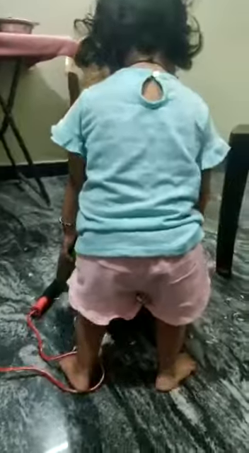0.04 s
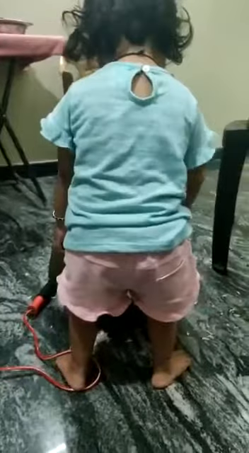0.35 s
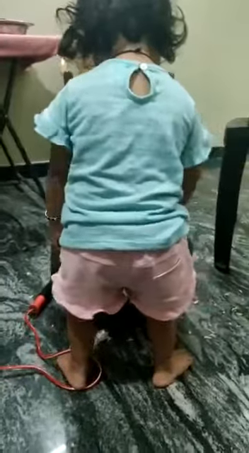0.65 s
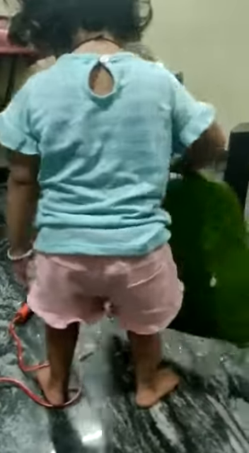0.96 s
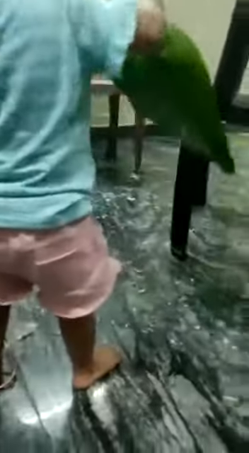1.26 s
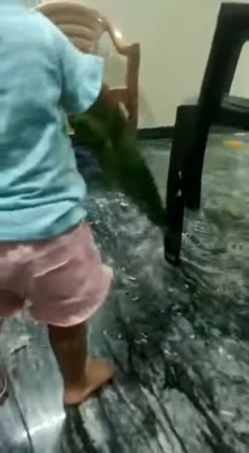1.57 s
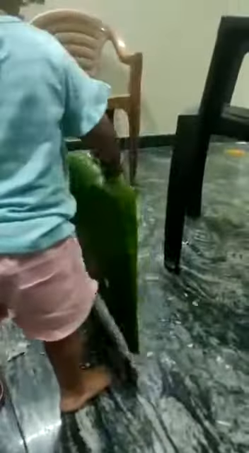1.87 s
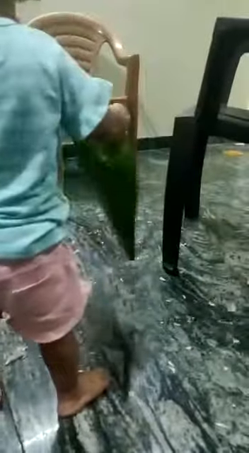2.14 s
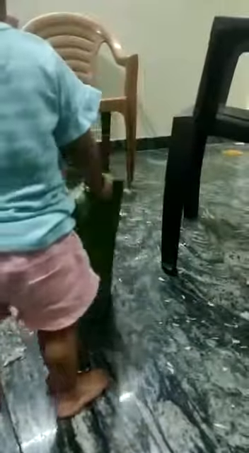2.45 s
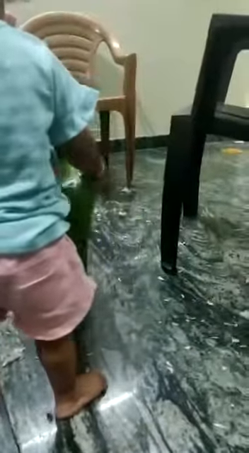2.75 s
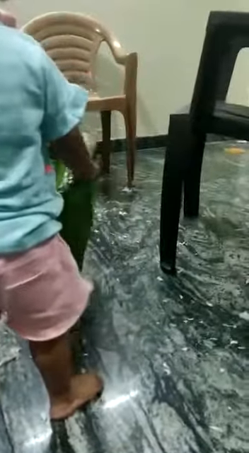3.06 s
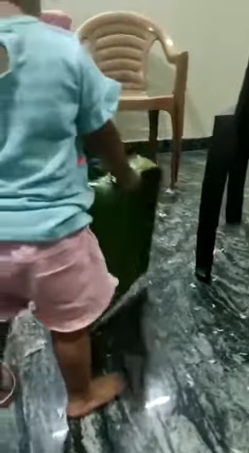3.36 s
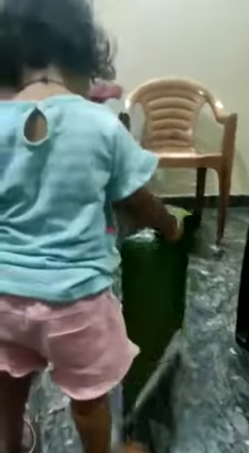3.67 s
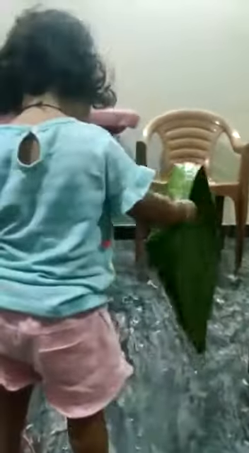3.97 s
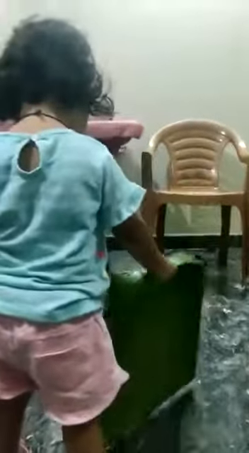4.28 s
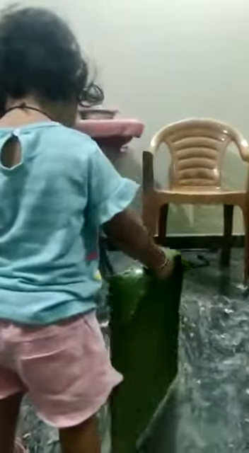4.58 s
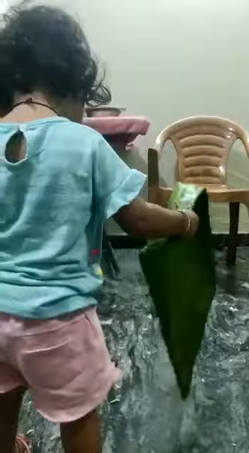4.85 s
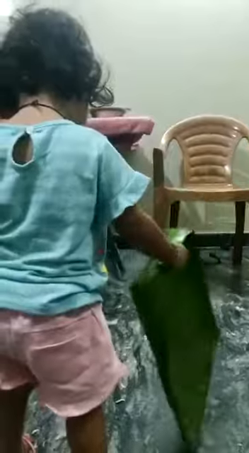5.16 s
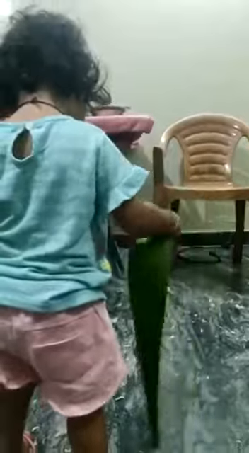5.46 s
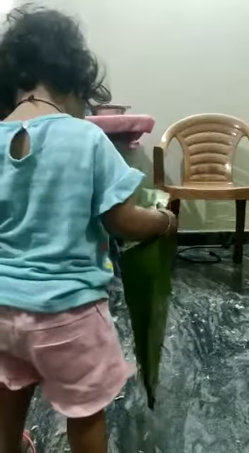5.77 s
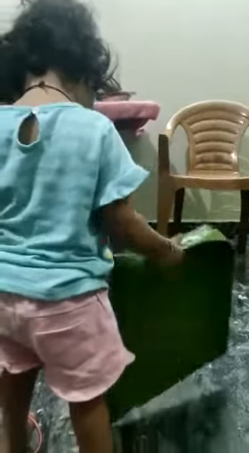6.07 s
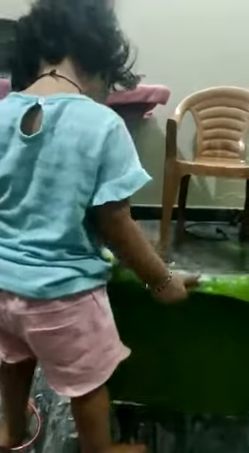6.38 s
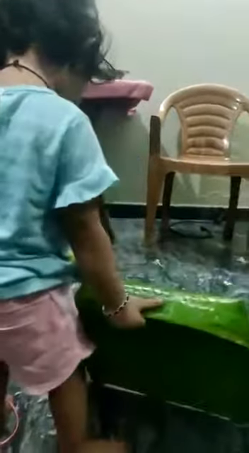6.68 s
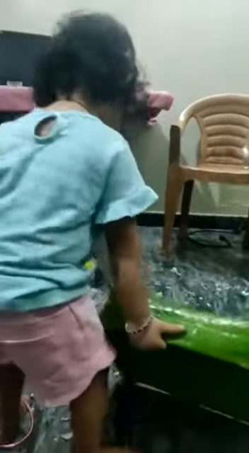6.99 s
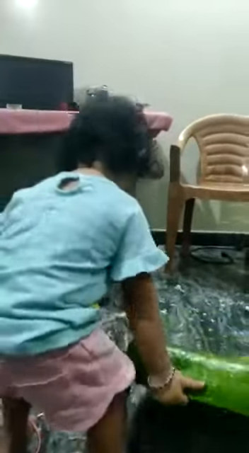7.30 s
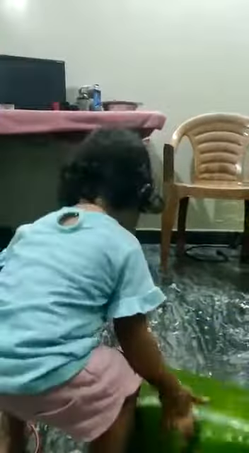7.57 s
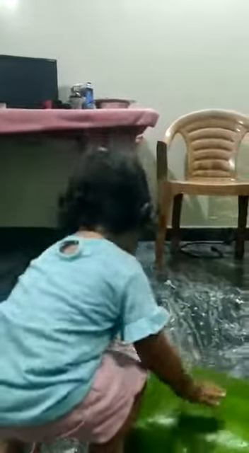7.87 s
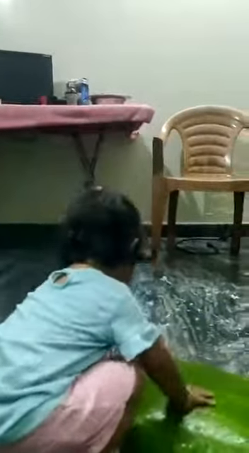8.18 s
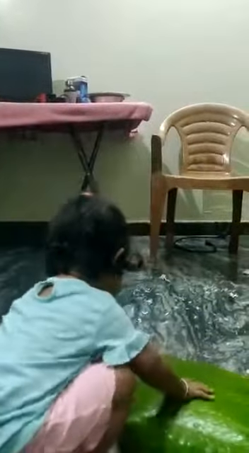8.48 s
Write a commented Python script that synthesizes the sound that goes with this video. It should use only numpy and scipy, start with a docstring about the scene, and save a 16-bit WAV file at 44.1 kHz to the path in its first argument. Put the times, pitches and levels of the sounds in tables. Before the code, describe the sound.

In a bare, echoing room with a low hum, a big leaf smacks a stone floor close to the microphone. The hits are irregular, some light and dull, others sharp and loud with a small flap afterwards, and faint rustling and crackling fill the gaps. Finally the leaf is slapped down and patted several times in quick succession, and a palm rubs quietly along it with a faint, thin squeak.

```python
"""A low hum, and over it the rustle of a big stiff leaf sliding on the stone floor of a bare room.
A small child swings the leaf against the floor, then lays it down and pats it flat.
Each blow is a thump of the bending blade, a clap of trapped air and a crackle of fibres,
and the hard walls ring after it. Near the end a hand rubs the leaf along and the palm squeaks."""
import sys
import numpy as np
from scipy import signal
from scipy.fft import rfft, irfft, next_fast_len
from scipy.io import wavfile
from scipy.ndimage import uniform_filter1d, minimum_filter1d, map_coordinates

SR = 44100
rng = np.random.default_rng(int(sys.argv[2]) if len(sys.argv) > 2 else 0)


def output_pcm(signal):
    """Save a mono or channel-first signal as 16-bit PCM at the path in sys.argv[1].

    Samples are clipped to [-1, 1] before scaling.
    """
    pcm = np.clip(np.atleast_2d(signal).T, -1, 1) * 32767
    wavfile.write(sys.argv[1], SR, np.round(pcm).astype(np.int16))


N = 385290
TIME = np.arange(N) / SR

# light strokes of the leaf across the stone: middle_s, length_s, level_db
STROKES = [(.25, 0.2, -56), (.68, 0.23, -50.5), (.97, 0.083, -51.5), (1.2, 1, -55), (2.08, 0.063, -58),
           (3.33, 0.34, -55.5), (3.85, 1, -61), (5.58, 0.13, -61.5), (5.98, 0.083, -56.5), (6.85, 1, -60),
           (7.3, 0.43, -53), (8.1, 0.21, -50.5), (8.52, 0.23, -50)]
# how alike the room sounds on the left and right (1 is the same): pitch_hz, likeness
LIKENESS = [(60, 0.93), (150, 0.98), (300, 0.79), (500, 0.68), (900, 0.037), (1800, -0.026), (4000, 0.089)]


def from_db(db):
    """Turn decibels into a gain to multiply by."""
    return 10 ** (np.asarray(db) / 20)


def rms_one(x):
    """Scale a sound so its average power is one."""
    return x / np.sqrt(np.mean(x ** 2) + 1e-20)


def at_hz(points, hz):
    """Read between a table's rows, with octaves evenly spaced."""
    row_hz, value = np.transpose(points)
    return np.interp(np.log(np.maximum(hz, 1)), np.log(row_hz), value)


def fade(t, ring_s):
    """A gain that falls by 60 dB in ring_s seconds."""
    return np.exp(-np.log(1000) * t / ring_s)


def add(tracks, start_s, near, to_room):
    """Mix a sound into two tracks: what is heard directly and what goes into the room."""
    start = int(start_s * SR)
    tracks[:, start:start + len(near)] += np.array([near, to_room])[:, :N - start]


def butter(x, hz, kind, order=2):
    """Keep only the lows, the highs or one band of a sound."""
    return signal.sosfilt(signal.butter(order, np.clip(hz, 10, .45 * SR), kind, fs=SR, output="sos"), x)


def coloured(x, colour, size=2048):
    """Give each pitch its level from a table, with no ringing ahead of the sound (minimum phase)."""
    cepstrum = irfft(np.log(from_db(at_hz(colour, np.arange(size // 2 + 1) * SR / size))))
    cepstrum[1:size // 2] *= 2
    cepstrum[size // 2 + 1:] = 0
    return signal.fftconvolve(x, irfft(np.exp(rfft(cepstrum))))[:len(x)]


def flutter(per_s, depth_db):
    """A gain that wanders at random."""
    knots = rng.standard_normal(N // 20)
    return from_db(depth_db * np.interp(TIME * per_s, np.arange(len(knots)), knots))


def swells(strokes):
    """A gain that rises and falls with each stroke, staying above half power for length_s."""
    return np.sqrt(sum(from_db(db) ** 2 * .5 ** np.minimum((2 * (TIME - middle_s) / length_s) ** 2, 100)
                       for middle_s, length_s, db in strokes))


def diffuse(colour, size=N):
    """Noise arriving from all sides: left and right are alike only in the bass."""
    padded = next_fast_len(size, real=True)
    hz = np.arange(padded // 2 + 1) * SR / padded
    mid, side = rfft(rng.standard_normal((2, padded)))
    alike = np.clip(at_hz(LIKENESS, hz), -.99, .99)
    pair = np.sqrt((1 + alike) / 2) * mid + np.sqrt((1 - alike) / 2) * side * [[1], [-1]]
    return irfft(pair * from_db(at_hz(colour, hz)), padded)[:, :size]


def thin_tones(rows):
    """Unsteady tones, made of narrow bands of noise, that swell and fade."""
    out = np.zeros(N)
    for middle_s, length_s, db, hz, width_hz in rows:
        gain = swells([(middle_s, length_s, db)]) * flutter(per_s=39, depth_db=2.5)
        band_hz = [hz - width_hz / 2, hz + width_hz / 2]
        out += gain * rms_one(butter(rng.standard_normal(N), band_hz, "band"))
    return out


def background_hum():
    """A low rumble with a few wavering tones in it."""
    # tone colour of the rumble: pitch_hz, level_db
    rumble_colour = [(20, -9), (35, -11), (55, -7.5), (78, -10.5), (100, -5), (125, -21.5), (170, -9),
                     (290, -14), (450, -22), (1000, -28), (3000, -34), (8000, -36.5), (16000, -12.5)]
    # tones that never stop: pitch_hz, level_db
    hum_tones = [(56.3, -57), (102.3, -64), (204.6, -66), (231.5, -64), (296.1, -62)]
    # faint tones that come and go: middle_s, length_s, level_db, pitch_hz, width_hz
    faint_tones = [(1.11, 0.33, -67, 1150, 53), (5.93, 0.35, -68, 700, 20)]
    tones = sum(from_db(db) * np.sqrt(2) * np.sin(2 * np.pi * hz * TIME)
                * flutter(per_s=26, depth_db=2.5) for hz, db in hum_tones)
    rumble = from_db(-40.5) * rms_one(diffuse(rumble_colour))
    return rumble + tones + thin_tones(faint_tones)


def slide():
    """The leaf hisses unevenly on the stone as each stroke gathers speed and slows again."""
    # tone colour of the hiss: pitch_hz, level_db
    hiss_colour = [(300, -26.5), (1000, -5.5), (2000, 2), (3500, -1.5), (6000, 3.5), (9000, 0),
                   (16000, -14.5)]
    return swells(STROKES) * flutter(per_s=61, depth_db=1.5) * rms_one(diffuse(hiss_colour))


def rib_ticks(per_s=22, boost_db=13, spread_db=3.5):
    """Ribs of the sliding leaf catch on the stone with tiny clicks."""
    sizes = from_db(boost_db + spread_db * np.minimum(rng.exponential(1, N), 3))
    clicks = (rng.random(N) < per_s / SR) * sizes * swells(STROKES)
    return butter(clicks + 1e-18, [1500, 9000], "band", order=1)


def scuffs():
    """The leaf's edge catches and skids: a narrow hiss that starts fast and fades."""
    # skids of the edge: start_s, length_s, level_db, pitch_hz, width_hz
    skids = [(0.57, 0.27, -57, 5360, 2210), (3.273, 0.27, -57, 1960, 1210),
             (5.534, 0.043, -57.5, 1190, 2080), (6.591, 0.029, -40, 6800, 3030),
             (7.671, 0.09, -34, 1770, 790)]
    t, tracks = TIME[:SR], np.zeros((2, N))
    for start_s, length_s, db, hz, width_hz in skids:
        band_hz = [max(hz - width_hz / 2, hz / 10), hz + width_hz / 2]
        hiss = rms_one(butter(rng.standard_normal(SR), band_hz, "band"))
        skid = from_db(db) * hiss * np.sin(np.pi * np.sqrt(np.minimum(t / length_s, 1)))
        add(tracks, start_s, skid, skid)
    return tracks


def thump(t, hz, ring_s, rise_s=0.0025, slack_share=0.11, tighten_s=0.0037):
    """The blade flexes briefly; the grip sets its pitch, which rises as it presses on the stone."""
    # ways the blade bends: pitch_ratio, level_db, ring_time_share
    blade_modes = [(0.401, -42.5, 0.65), (0.719, -2, 0.27), (0.999, -2, 0.58), (1.45, -26.5, 0.84),
                   (2.05, -36.5, .8)]
    cycles = hz * (t - slack_share * tighten_s * (1 - np.exp(-t / tighten_s)))
    flex = sum(from_db(db) * np.sin(2 * np.pi * cycles * ratio) * fade(t, ring_s * share)
               for ratio, db, share in blade_modes)
    return -flex * (1 - np.exp(-t / rise_s))


def clap(t, hz, hollow_db, landing_s, top_hz, touch_count=5):
    """A puff of air rings in the hollow under the blade; smaller touches follow as the rest lands."""
    # tone colour of the air squeezed out: pitch_ratio, level_db
    puff_colour = [(.06, -18.5), (.17, -9.5), (.35, -0.5), (.65, -1.5), (1, -4), (1.25, -4.5), (1.6, -11.5),
                   (2.15, -11), (3, -20.5), (5.5, -27), (15, -36.5)]
    puff = coloured(signal.unit_impulse(len(t)), np.array(puff_colour) * [hz, 1])
    puff = puff / np.abs(puff).max()
    hollow = butter(puff, [hz / 1.08, hz * 1.08], "band", order=1)
    puff = butter(puff + (from_db(hollow_db) - 1) * hollow, top_hz, "low", order=4)
    delays = (landing_s * SR * rng.gamma(2, .5, touch_count)).astype(int)
    touches = np.bincount(delays, weights=rng.uniform(0.04, 0.4, touch_count))
    touches[0] += 1
    spread = signal.fftconvolve(touches, puff)[:len(t)]
    near = spread * np.linalg.norm(puff) / np.linalg.norm(spread)
    # the walls merge the touches, so the room gets one puff of the same energy
    return np.array([near, puff])


def crackle(t, snap_s=0.0022, settle_s=0.057, settle_db=-15, grain_db=4, edge_db=4):
    """Fibres snap on contact and tick as the blade settles; gives the near sound and the room's part."""
    # papery ring of the fibres: pitch_hz, level_db
    fibre_colour = [(200, 13), (700, 3), (1450, 4), (1870, 10), (2150, 5), (2700, -1), (5000, -1),
                    (8500, -3), (15000, -10.5)]
    noise = rng.standard_normal(len(t))
    grains = rms_one(noise * from_db(grain_db * np.minimum(rng.exponential(1, len(t)), 4)))
    snap = grains * np.exp(-t / snap_s)
    settle = grains * from_db(settle_db) * np.exp(-t / settle_s) * (1 - np.exp(-t / snap_s))
    # the walls blur the snap's grains together, so the room gets one even click
    click = np.linalg.norm(snap) * signal.unit_impulse(len(t))
    crisp_edge = from_db(edge_db) * butter(click, 11000, "high")
    return np.array([coloured(onset + settle, fibre_colour) for onset in (snap + crisp_edge, click)])


def blows():
    """The leaf hits the floor: a thump, a clap and a crackle together."""
    # blows of the leaf: start_s, thump_db, thump_hz, ring_s, clap_db, clap_hz,
    # hollow_db, crackle_db, room_db
    hits = [ (0.7412, -16, 319, 0.081, -28.5, 666, 5.5, -44, 2),
            (1.375, -9.5, 260, 0.023, -21.5, 1150, 6.5, -26, 10.5),
            (1.7138, 4, 315, 0.046, 4.5, 735, 3.5, -10.5, -2),
            (2.3958, -18, 270, 0.016, -37, 620, 0, -37.5, 13),
            (2.465, -8, 207, 0.033, 6.5, 917, 8, -14.5, -2),
            (3.085, -14.5, 278, 0.034, -32, 1000, 4.5, -31, 9),
            (3.4138, -14, 195, 0.059, -26, 890, -6, -31.5, 3),
            (3.4537, -13, 190, 0.011, -12, 765, 3.5, -40.5, -1),
            (4.2215, -23, 218, 0.036, -18.5, 550, 9, -21, 6),
            (4.296, -2, 211, 0.036, -21, 1000, -12, -18, 3),
            (4.3149, 1.5, 307, 0.033, 1, 1000, 7, -21, -2.5),
            (4.392, -8.5, 400, 0.055, -18.5, 576, 18, -30, -2),
            (5.066, -10, 306, 0.032, -51.5, 1260, 27.5, -26, 7.5),
            (6.161, -18.5, 257, 0.043, -26.5, 900, 6.5, -33.5, 8.5),
            (6.188, -5.5, 213, 0.033, -43, 960, -7, -24.5, 2.5),
            (6.212, 0, 262, 0.034, -2.5, 896, 2.5, -33, 1),
            (7.2548, -4.5, 269, 0.032, -21, 850, 5, -26, 0.5),
            (7.6048, -8, 154, 0.043, -24, 420, 14.5, -23.5, 0.5),
            (7.6656, 5.5, 432, 0.072, -6, 798, 8, -14.5, -1),
            (7.7877, -5, 288, 0.022, -10.5, 870, 2, -27, 3.5),
            (7.844, -22, 250, 0.041, -4, 970, 4, -22.5, -0.5), ]
    # edge-first landings crackle and take time; flat ones clap at once, cushioned by the air:
    # clap_over_crackle_db, landing_s, clap_top_hz
    landings = [(17.03, 0.0041, 11500), (25.17, 0.00073, 5700), (31, 0.00062, 1380)]
    flatness_db, landing_times_s, tops_hz = np.transpose(landings)
    t, tracks = TIME[:SR // 5], np.zeros((2, N))
    for start_s, thump_db, thump_hz, ring_s, clap_db, clap_hz, hollow_db, crackle_db, room_db in hits:
        landing_s = np.interp(clap_db - crackle_db, flatness_db, landing_times_s)
        top_hz = np.interp(clap_db - crackle_db, flatness_db, tops_hz)
        flex = from_db(thump_db) * thump(t, thump_hz, ring_s)
        puff, room_puff = from_db(clap_db) * clap(t, clap_hz, hollow_db, landing_s, top_hz)
        snap, room_snap = from_db(crackle_db) * crackle(t)
        to_room = from_db(-5.5) * flex + from_db(-1.5) * room_puff + from_db(-8.5) * room_snap
        add(tracks, start_s, flex + puff + snap, to_room * from_db(room_db))
    return tracks


def thuds(ring_s=0.21, room_db=-4):
    """Dull, soft thuds on the floor: a low thump alone."""
    # soft landings: start_s, level_db, pitch_hz
    soft_hits = [(0.745, -27, 111), (6.778, -27, 196.4), (6.937, -33, 230)]
    t, tracks = TIME[:SR // 5], np.zeros((2, N))
    for start_s, db, hz in soft_hits:
        flex = from_db(db) * thump(t, hz, ring_s)
        add(tracks, start_s, flex, flex * from_db(room_db))
    return tracks


def creases(room_db=-6):
    """The blade creases, and its fibres crackle with no thump."""
    # folds of the blade: start_s, level_db
    folds = [(1.4, -34), (1.6, -35.5), (4.964, -55), (7.139, -42), (7.9999, -26), (8.368, -78)]
    t, tracks = TIME[:SR // 5], np.zeros((2, N))
    for start_s, db in folds:
        snap, room_snap = from_db(db) * crackle(t)
        add(tracks, start_s, snap, room_snap * from_db(room_db))
    return tracks


def flaps(ring_s=0.054, crackle_db=-22, room_db=-3.5):
    """The loose part of the blade flaps down again after a hard blow."""
    # second landings: start_s, level_db, pitch_hz
    rebounds = [(1.7275, -4, 630), (1.761, -16, 684), (4.325, -13, 417), (4.337, -17, 404),
                (4.44, -15, 346), (6.222, -15, 400), (6.235, -6.5, 330), (7.6755, -3, 470),
                (7.689, -16, 763), (7.695, -11, 352), (7.712, -19, 724), (7.734, -9.5, 456),
                (7.856, -18, 230), (7.892, -11, 835)]
    t, tracks = TIME[:SR // 5], np.zeros((2, N))
    for start_s, db, hz in rebounds:
        flex = from_db(db) * thump(t, hz, ring_s)
        snap, room_snap = from_db(db + crackle_db) * crackle(t)
        add(tracks, start_s, flex + snap, (flex + room_snap) * from_db(room_db))
    return tracks


def rub():
    """A hand presses the blade along the floor, making a dull, rough noise; the same rough rustle follows as
    the blade settles after the last hard blow."""
    # pushes of the hand, and at 7.74 s the blade's rustle as it settles after the last hard blow: middle_s,
    # length_s, level_db
    presses = [(7.35, 1, -49.5), (7.74, 0.11, -47), (8.49, 0.1, -41), (8.62, 0.17, -49.5)]
    # tone colour of the rub: pitch_hz, level_db
    rub_colour = [(100, -15), (300, -8), (450, 11.5), (620, -7), (850, -0.5), (1250, -4.5), (1800, 0.5),
                  (3000, -48), (8000, -10.5)]
    return swells(presses) * flutter(per_s=350, depth_db=-2.0) * rms_one(diffuse(rub_colour))


def squeaks():
    """The palm squeaks thinly as it slides over the blade."""
    # slips of the palm: middle_s, length_s, level_db, pitch_hz, width_hz
    slips = [(8.25, 0.11, -35, 15340, 397), (8.25, 0.065, -50, 9370, 500)]
    return thin_tones(slips)


def room(x, build_s=0.0005, gap_s=0.0024, early_db=5.5, early_s=0.0069, smooth_s=0.04):
    """Hard walls: strong first echoes, then a steady fade band by band; standing waves ring on."""
    # how long the echoes take to fall by 60 dB: pitch_hz, ring_s
    ring_times = [(100, 1.62), (260, 1.075), (700, 0.83), (1800, 0.87), (5000, 0.68), (12000, 0.71)]
    # tone colour of the echoes: pitch_hz, level_db
    echo_colour = [(60, 0.61), (150, 4.5), (300, 3.1), (700, 1.65), (2000, 0.31), (6000, 4.8), (14000, 1.5)]
    # notes that ring between the walls: pitch_hz, level_db, ring_s
    standing_waves = [(136.1, -67.5, 2.1), (172.1, -53.5, 1.4), (220, -71.5, 1.4), (293.5, -63, 0.93),
                      (312.2, -59, 1.06), (398, -57, 0.8), (422.2, -57, 0.89), (494, -56.5, 0.72),
                      (571, -64.5, 0.6), (618, -63.5, 0.62), (663, -63, 0.54), (692.4, -55.5, 0.56),
                      (813, -59.5, 0.71), (862, -56.5, 0.83), (960, -52.5, 0.47), (1093, -55, 0.55)]
    t = TIME[:SR * 3 // 2]
    hz = np.arange(len(t) // 2 + 1) * SR / len(t)
    echoes, tail = rfft(diffuse(echo_colour, size=len(t))), 0
    early_boost = from_db(early_db * np.exp(-t / early_s))
    centres_hz = np.geomspace(80, 14000, 9)
    for centre_hz, pick in zip(centres_hz, np.eye(len(centres_hz))):
        ring_s = at_hz(ring_times, centre_hz)
        band = irfft(echoes * at_hz(np.c_[centres_hz, pick], hz), len(t))
        power = np.mean(band ** 2, axis=0)
        even_band = band * np.sqrt(power.mean() / uniform_filter1d(power, size=int(smooth_s * SR)))
        same_energy = np.sqrt(2 * np.log(1000) / (ring_s * SR))
        tail += even_band * early_boost * fade(t, ring_s) * same_energy
    for k, (wave_hz, db, ring_s) in enumerate(standing_waves):
        # shorter waves reach left and right further out of step
        apart = np.arccos(np.clip(at_hz(LIKENESS, wave_hz), -1, 1)) * np.array([[.5], [-.5]])
        wave = (-1) ** k * np.sin(2 * np.pi * wave_hz * t + apart * (-1) ** (k // 2))
        tail += from_db(db) * wave * fade(t, ring_s)
    tail *= 1 - np.exp(-np.maximum(t - gap_s, 0) / build_s)
    return signal.fftconvolve(x[None], tail, axes=1)[:, :N]


def straight_path(x):
    """The leaf moves off to the right, so its sound reaches the left microphone late."""
    # delay on the left: time_s, lag_ms
    left_lag = [(3.5, 0.064), (4.2, 0.14)]
    lag_s = np.interp(TIME, *np.transpose(left_lag)) / 1000
    left = map_coordinates(x, [(TIME - lag_s) * SR], order=3)
    return np.array([left, x])


def scene():
    """The leaf, the room's ring and the background hum, in stereo."""
    tracks = blows() + flaps() + thuds() + creases() + scuffs()
    near, to_room = tracks + rib_ticks() + squeaks()
    return straight_path(near) + room(to_room) + slide() + rub() + background_hum()


def limiter(x, ceiling_db, release_db_per_s):
    """Peaks over the ceiling pull the volume down at once; it then comes back."""
    over_db = 20 * np.log10(np.maximum(np.abs(x).max(axis=0) / from_db(ceiling_db), 1))
    cut_db = np.maximum.accumulate(over_db + release_db_per_s * TIME) - release_db_per_s * TIME
    return x * uniform_filter1d(minimum_filter1d(from_db(-cut_db), size=21), size=21)


def record(dry, cutoff_hz=16000):
    """Two microphone openings colour the sound; loud peaks are held down and the top treble is cut."""
    # what the left opening lets through: pitch_hz, level_db
    left_colour = [(1000, 3.5), (2400, -2), (4000, 2.5), (5400, 1), (6400, 10), (7500, -2), (9000, -15.5),
                   (10200, -22), (15000, -28.5)]
    # what the right opening lets through: pitch_hz, level_db
    right_colour = [(1000, 3.5), (2400, 1.5), (4000, -3.5), (5400, 1), (6400, -7.5), (7500, 1.5),
                    (9000, -2.5), (10200, -23), (15000, -26.5)]
    heard = np.array([coloured(dry[0], left_colour), coloured(dry[1], right_colour)])
    heard = limiter(heard, ceiling_db=2.5, release_db_per_s=70)
    heard = limiter(heard, ceiling_db=-1.2, release_db_per_s=4000)
    return signal.sosfiltfilt(signal.ellip(8, .05, 60, cutoff_hz, fs=SR, output="sos"), heard)


dry = scene()
out = record(dry)
output_pcm(out)
```